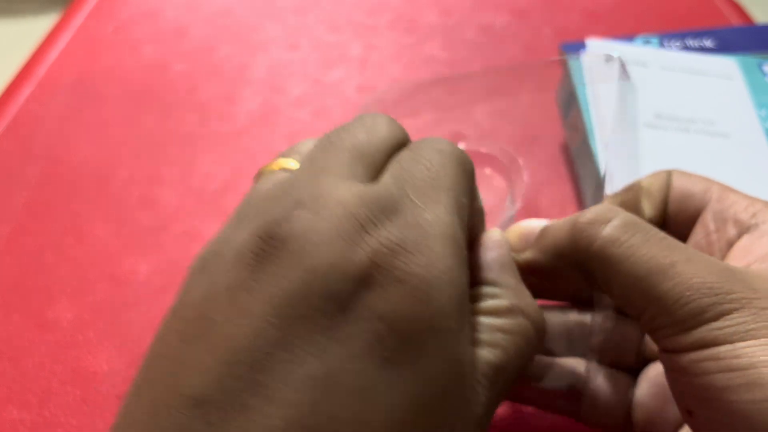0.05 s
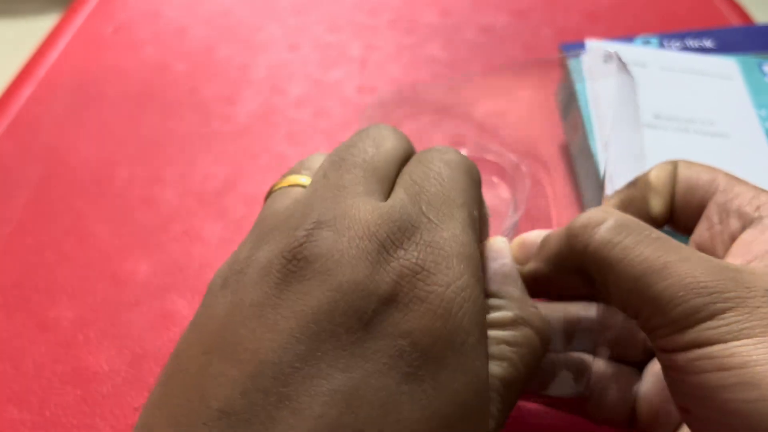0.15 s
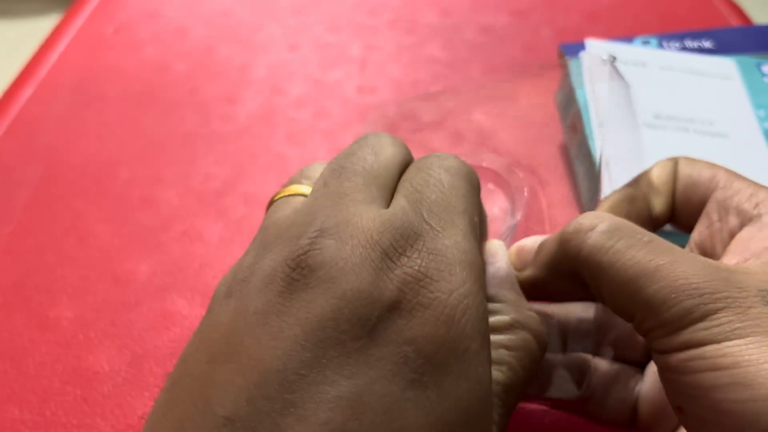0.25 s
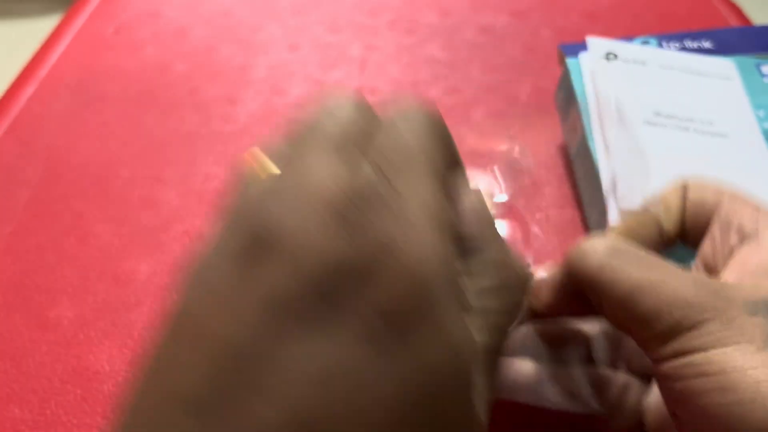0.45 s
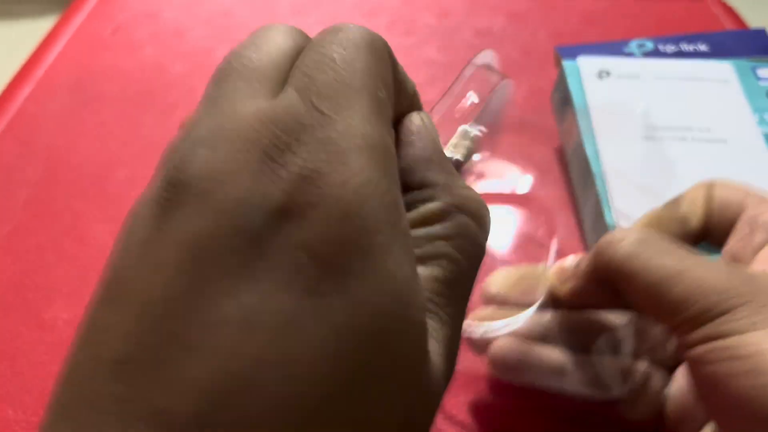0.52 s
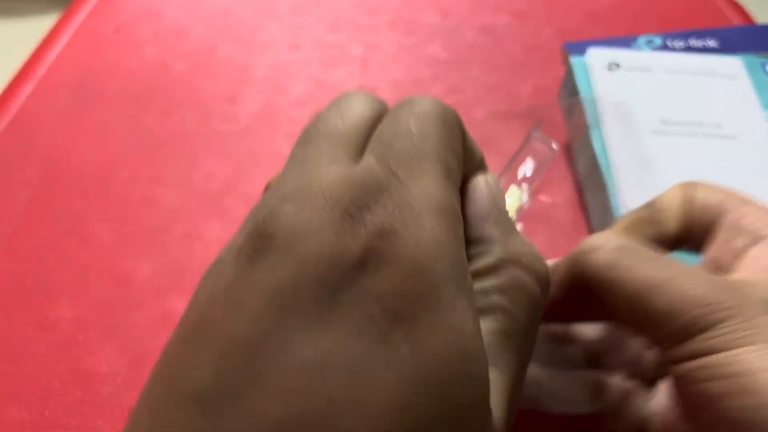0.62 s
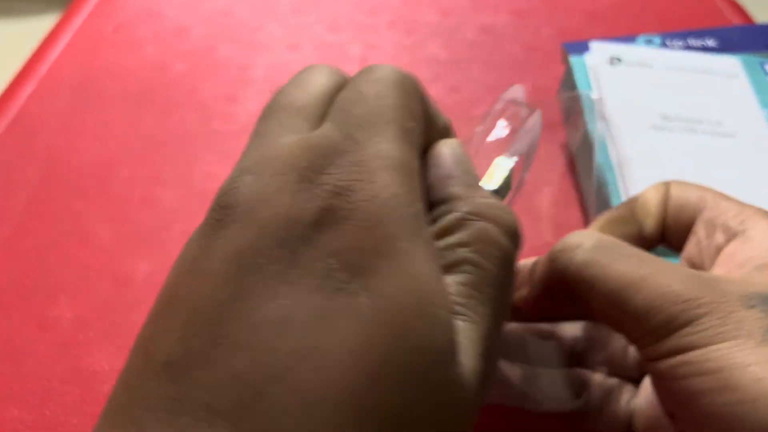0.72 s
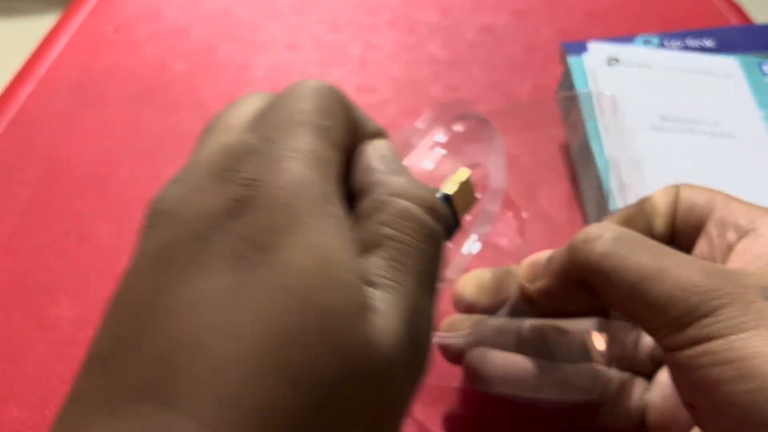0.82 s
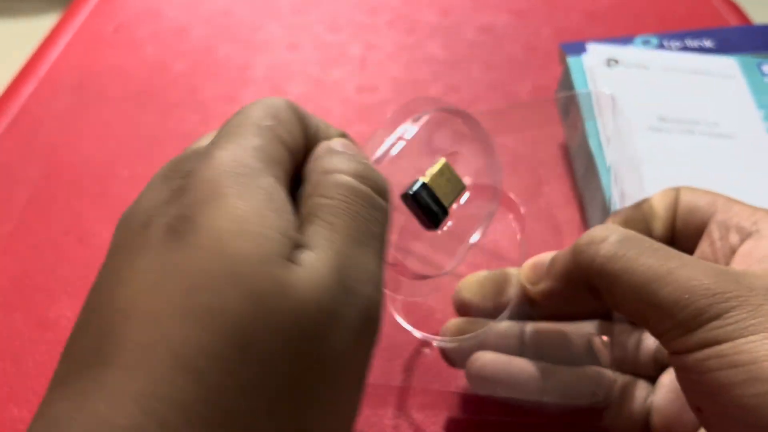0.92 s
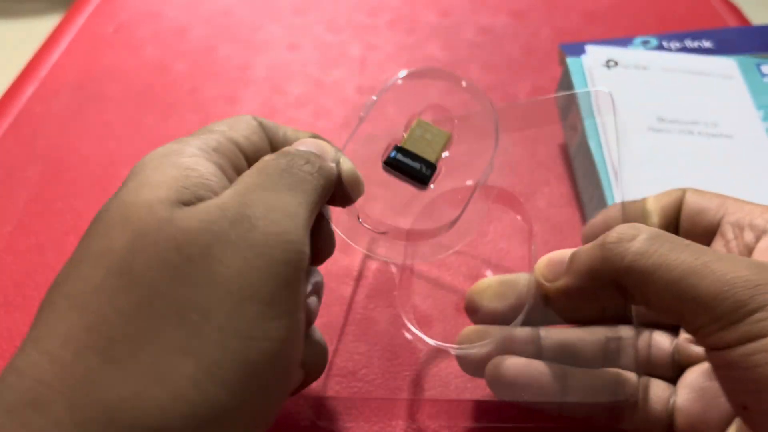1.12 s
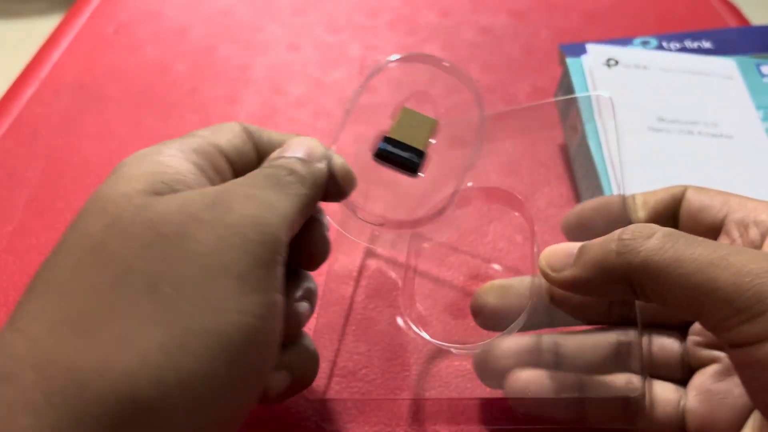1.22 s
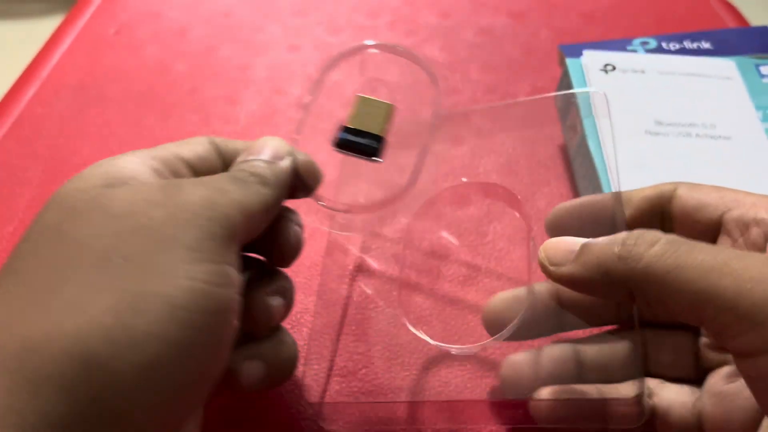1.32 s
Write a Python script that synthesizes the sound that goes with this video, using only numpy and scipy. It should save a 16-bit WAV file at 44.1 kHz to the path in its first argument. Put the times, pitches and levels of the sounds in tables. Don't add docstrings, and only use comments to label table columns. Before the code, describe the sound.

A stiff plastic blister tray is pried open close to the microphone: a few light clicks, then a loud burst of cracks and hollow pops with soft hand bumps, then sparse faint ticks in a quiet room.

```python
import sys
import numpy as np
from scipy import signal
from scipy.fft import rfft, irfft, next_fast_len
from scipy.io import wavfile

SR = 44100
rng = np.random.default_rng(int(sys.argv[2]) if len(sys.argv) > 2 else 0)


def boost(x):
    u = np.asarray(x, float) / 20
    return 10 ** u


def file_out(sig):
    cols = np.atleast_2d(sig).T
    lim = np.clip(cols, -1, 1)
    pcm = np.round(lim * 32767).astype(np.int16)
    wavfile.write(sys.argv[1], SR, pcm)


N = 59535

# (frequency [Hz], level [dB per Hz])
ROOM_COLOUR = [(22, -25.5), (45, -2), (110, -17), (140, -10.5), (480, -14), (620, -24), (2200, -36.5),
               (9000, -76)]
# (frequency [Hz], likeness [0 to 1])
PORT_LIKENESS = [(60, 0.94), (250, 1), (950, 0.2), (3800, 0.2), (15000, 0.601)]
# (frequency [Hz], width [Hz], level [dB])
MAINS_DRONE = [(50.2, 14, -54), (96.7, 9, -54)]
# (time [s], peak level [dB], pitch [Hz], time to fall 60 dB [s])
HAND_BUMPS = [(0.432, -33, 393, 0.03), (0.442, -20.5, 95, 0.045), (0.462, -25, 387, 0.05),
              (0.472, -25, 88.2, 0.066), (0.481, -18.5, 74, 0.11), (0.5, -20, 119.3, 0.025),
              (0.522, -29.5, 72.4, 0.12), (.492, -47, 494, 0.026), (.524, -39, 486, 0.029),
              (0.534, -28.5, 293, 0.0365), (0.545, -39, 427, 0.048), (0.562, -32, 142, 0.078),
              (.617, -43.5, 466, 0.12), (0.541, -19, 89.3, 0.058), (0.66, -25.5, 196, 0.039),
              (0.6614, -32.5, 287.4, 0.12), (0.68, -39, 109, 0.082), (0.787, -30.5, 104.4, 0.11),
              (0.894, -33.5, 104, 0.16)]
# (time [s], rubbing level [dB], crinkle level [dB])
FINGER_WORK = [(0, -68, -66.5), (.22, -73, -80), (0.383, -64, -95), (0.403, -34.5, -58), (0.469, -32, -47),
               (0.508, -34.5, -45), (.54, -55, -66), (.60, -48, -50), (0.643, -49, -50.5),
               (0.708, -75, -76), (0.724, -49.5, -66), (0.772, -45.5, -64.5), (0.831, -64.5, -84.5),
               (0.928, -71, -83.5), (0.987, -56, -79.5), (1.16, -62, -71.5), (1.271, -61.5, -64.5),
               (1.298, -52, -68)]
# (frequency [Hz], width [Hz], level [dB])
CUP_MODES = [(1250, 410, 6), (762, 100, -0.5), (397, 310, -0.5), (2200, 340, -3.5), (3520, 840, -15)]
# (frequency [Hz], level [dB per Hz])
PLASTIC_COLOUR = [(900, -35.5), (1600, 4), (3000, 0), (6400, -3.5), (8300, 8), (10500, 2.5), (14000, -7),
                  (16500, -15)]
# (frequency [Hz], width [Hz], height [dB])
SHEET_MODES = [(2390, 270, 4.5), (3000, 250, 8), (3855, 100, 5), (4430, 390, 7), (5300, 370, 3),
               (6400, 1300, 7.5)]
# (time [s], peak level [dB], pitch [Hz], length [ms])
POPS_AND_RINGS = [(0.123, -27, 1250, 3.45), (0.1523, -23.5, 1250, 3.5), (0.2271, -14.5, 1407, 2.54),
                  (0.391, -11, 1364, 2.73), (0.3929, -25.5, 2200, 1.8), (0.4065, -25, 1666, 1.9),
                  (0.412, -27.5, 1440, 6.1), (0.4198, -27, 1470, 3.3), (0.4262, -1, 1349, 3.0),
                  (.4258, -17.5, 690, 6.24), (0.432, -29, 1250, 1.8), (0.4577, -12, 1328, 4.2),
                  (0.4625, -18.5, 1343, 4.1), (0.4617, -17, 2200, 1), (0.494, -34, 1050, 4.5),
                  (.501, -21.5, 1088, 5.6), (0.585, -22, 1244, 2.4), (0.5888, -25, 1426, 3.37),
                  (0.616, -28.5, 5480, 3.3), (0.633, -27.5, 5400, 1.9), (0.246, -40.5, 4820, 4.7),
                  (1.271, -33, 1300, 2.1), (1.2702, -41, 3720, 3.2), (1.178, -40.5, 2200, 1.2),
                  (1.227, -46.5, 2580, 2.3), (1.252, -44, 2180, 1.6), (0.636, -41.5, 575, 9.4),
                  (1.295, -36, 1210, 2.35), (1.303, -48, 1220, 10), (.722, -39, 1310, 4), (0.728, -41, 1300, 9),
                  (.742, -42.5, 1250, 5.2), (0.767, -48, 1700, 4.5), (0.813, -42.5, 1270, 4.1),
                  (1.338, -40, 1195, 6.4),
                  (0.1252, -29.5, 2390, 2.4), (.1245, -26.5, 5630, 1.2), (0.151, -46, 2960, 5.5),
               (.2265, -46, 2390, 4), (0.2267, -33.5, 3720, 2.6), (0.217, -44, 1701, 22.3),
               (0.379, -44.5, 1690, 17), (.3905, -16.5, 3790, 2.65), (.3908, -18, 4540, 1.36),
               (0.389, -42, 2420, 3.2), (.404, -30, 3000, 2.6), (0.4388, -19, 2817, 2.9),
               (.443, -29.5, 3140, 2.6), (.4465, -33.5, 6400, 3), (0.452, -24, 1450, 2.1),
               (0.4579, -27.5, 4020, 3), (.4875, -25.5, 890, 4.4), (.4925, -27.5, 2150, 4.4),
               (0.4936, -26, 3480, 1.9), (.503, -30, 2070, 6), (.503, -41, 3350, 2.8),
               (0.5911, -35, 1940, 4), (0.59, -31.5, 1247, 6.9), (.617, -35.5, 4280, 4),
               (0.63, -36.5, 3780, 3.8), (1.084, -48.5, 3460, 3.3), (1.085, -52, 2370, 3.2),
               (1.176, -54, 3630, 3), (1.192, -46, 3060, 3.2), (1.237, -56, 2130, 4),
               (1.271, -43.5, 2830, 4.5), (1.289, -42, 3030, 3), (1.301, -49, 2940, 10),
               (1.296, -54, 5900, 5)]
# (frequency [Hz], width [Hz], level [dB])
CUP_AFTER_RING = [(1320, 300, -20), (1750, 260, -16)]
# (time [s], level [dB],
# length [ms], tilt [dB per octave])
CRACKS_AND_TICKS = [(.1249, -33, 1.4, 2), (.140, -56, 6, -1.5), (.168, -57, 7, -2), (.1537, -33.5, 2.25, -0.5),
                    (.2263, -24.5, 1.01, -0.05), (.238, -50, 3.8, 7.5), (.3906, -22.5, 1.3, -1),
                    (.4021, -33, 4, -1), (.4045, -26.5, 1, 2), (.4115, -35.5, 1.2, 4), (.4152, -33, 1.4, 1.5),
                    (.4259, -17, 0.86, -2.5), (.4386, -20, 2.2, -5.5), (.4420, -22.5, 1.7, 1.5),
                    (.4467, -26.5, 0.47, 2), (.4505, -33.5, 2, -5.5), (.4575, -27, 3.2, -5),
                    (.4655, -31.5, 1.9, -7.5), (.474, -40, 3.4, -8), (.489, -24.5, 2.9, -7),
                    (.500, -26.5, 4.0, -8.5), (.5838, -25.5, 1.2, 1), (.5895, -34.5, 1.2, 1),
                    (.6163, -36.5, 2.5, 4), (.6313, -44, 2.25, 7.5), (1.087, -54.5, 2.5, -4.5),
                    (1.2701, -38.5, 0.82, -2.5),
                    (0.038, -51, 1.94, -5.5), (.088, -78, 1.1, -17), (.757, -37.5, 4.9, -8.5),
              (0.769, -60, 3, -7), (0.743, -62, 3, -9), (0.976, -45.5, 4.4, -10), (1.155, -61, 3, 6),
              (1.175, -44, 2.6, -9), (1.193, -50.5, 1, -5.5), (1.205, -58.5, 2.6, -3.5),
              (1.227, -47, 0.99, -10), (1.238, -70, 1.1, -8), (1.288, -57, 9.2, 1),
              (1.301, -55.5, 5.2, -1.5), (1.322, -56, 2, 2)]
# (frequency [Hz], left lead [radians])
PORT_LEAD = [(60, 0), (1000, -.5), (1550, -1.2), (2400, .8), (4570, 1.0), (7900, -3.0), (9600, -3.8),
             (15000, -9.4)]
# (frequency [Hz], left minus right [dB])
PORT_TILT = [(60, 1.0), (180, 2.5), (550, 1.5), (1650, 0.5), (4970, 3.5), (15000, -0.5)]

SIDES = np.array([[1], [-1]])


def rms_one(x):
    return x / np.sqrt(np.mean(x ** 2) + 1e-20)


def at_hz(points, hz):
    p = np.array(points, float)
    return np.interp(np.log(hz + 1), np.log(p[:, 0] + 1), p[:, 1])


def shaped(x, response):
    size = next_fast_len(N + 4096)
    return irfft(rfft(x, size) * response(np.fft.rfftfreq(size, 1 / SR)), size)[..., :N]


def resonate(x, peaks):
    out = 0
    for hz, width, db in peaks:
        r = np.exp(-np.pi * width / SR)
        b = np.array([1, 0, -1]) * (1 - r * r) / 2
        a = [1, -2 * r * np.cos(2 * np.pi * hz / SR), r * r]
        once = signal.lfilter(b, a, x + 1e-18)
        out = out + boost(db) * signal.lfilter(b, a, once)
    return out


def drift(rate_hz):
    r = np.exp(-2 * np.pi * rate_hz / SR)
    wander = signal.lfilter([1], [1, -2 * r, r * r], rng.standard_normal(N + SR))
    return rms_one(wander[SR:])


def rumble():
    def alike(hz):
        return np.clip(at_hz(PORT_LIKENESS, hz), 0, 1)

    mid, side = rng.standard_normal((2, N))
    mid = shaped(mid, lambda hz: boost(at_hz(ROOM_COLOUR, hz)) * np.sqrt(1 + alike(hz)))
    side = shaped(side, lambda hz: boost(at_hz(ROOM_COLOUR, hz)) * np.sqrt(1 - alike(hz)))
    drone = 0
    for hz, width, db in MAINS_DRONE:
        hum = resonate(rng.standard_normal(N + SR), [(hz, width, 0)])
        drone = drone + boost(db) * rms_one(hum[SR:])
    room_level_db = -48
    return boost(room_level_db) * rms_one(mid + side * SIDES) + drone


def room(x):
    t60_s, wall_cut_hz = 0.42, 6600
    t = np.arange(SR // 2) / SR
    fade = boost(-60 * t / t60_s) * np.clip(t / 0.004 - .5, 0, 1)
    mid, side = rng.standard_normal((2, len(t))) * fade
    b, a = signal.butter(1, [300, wall_cut_hz], "band", fs=SR)
    tail = signal.lfilter(b, a, mid + 0.52 * side * SIDES)
    return signal.fftconvolve(x, tail / np.sqrt(np.sum(tail[0] ** 2)), axes=1)[:, :N]


def bumps():
    out, t = np.zeros(N + SR), np.arange(SR // 2) / SR
    for s, db, hz, t60 in HAND_BUMPS:
        swell = 1 - np.exp(-t * hz * 9.8)
        fade = 1.376 * boost(db - 60 * t / t60)
        start = int(s * SR)
        out[start:start + len(t)] += fade * swell * np.sin(2 * np.pi * hz * t)
    return out[:N]


def bright(x):
    return shaped(x, lambda hz: boost(at_hz(PLASTIC_COLOUR, hz)))


def rubbing():
    s, rub_db, crinkle_db = np.transpose(FINGER_WORK)
    now = np.arange(N) / SR
    rub_db, crinkle_db = np.interp(now, s, rub_db), np.interp(now, s, crinkle_db)

    grains_per_s, size_spread_db, clump_db = 6000, 3.0, 2.0
    sizes = boost(size_spread_db * np.minimum(rng.exponential(1, (3, N)), 4))
    sizes = sizes * rng.choice([-1, 1], (3, N))
    chance = grains_per_s * boost(clump_db * drift(50)) / SR
    rub, crinkle, port_own = sizes * (rng.random((3, N)) < chance)
    low = resonate(rub + 0.34 * port_own * SIDES, CUP_MODES)

    pitches, ring_cycles, tilt_db = np.geomspace(2200, 13500, 16), 4.7, -9
    dealt = rng.integers(0, 16, N)
    lean = boost(2 * rng.standard_normal(N) * SIDES)
    high = 0
    for k, hz in enumerate(pitches):
        mode = (hz, 11.0 * hz / ring_cycles, tilt_db * np.log2(hz / 5000))
        struck = 2 * crinkle * lean * (dealt == k) + .5 * crinkle
        high = high + resonate(struck, [mode])
    return boost(rub_db + 2) * rms_one(low) + boost(crinkle_db + 2) * rms_one(bright(high))


def pops():
    out, t = np.zeros(N + SR), np.arange(2048) / SR
    for s, db, hz, ms in POPS_AND_RINGS:
        u = np.clip(1000 * t / max(ms, .5), 0, 1)
        hump = np.sin(np.pi * u ** 1.31) ** 1.19
        out[int(s * SR):][:2048] += boost(db) * hump * np.sin(2 * np.pi * hz * t)
    return out[:N] + resonate(out[:N], CUP_AFTER_RING)


def sheet(hz):
    humps_db = sum(db / (1 + (2 * (hz - at) / width) ** 2) for at, width, db in SHEET_MODES)
    return boost(-3.5 + humps_db)


def cracks():
    own_share, first_break = .25, 2.5
    spray, t = np.zeros((2, N + SR)), np.arange(2048) / SR
    rows = CRACKS_AND_TICKS
    octaves = np.log2(np.fft.rfftfreq(2048, 1 / SR) / 5000 + 0.041)
    for (s, db, ms, tilt_db), noise in zip(rows, rng.standard_normal((len(rows), 3, 2048))):
        ms = max(ms, .2)
        grit = (noise[0] + own_share * noise[1] * SIDES) * boost(2 * noise[2])
        grit[:, int(ms * SR / 2000)] += first_break
        grit = irfft(rfft(grit) * boost(tilt_db * octaves))
        u = 2000 * t / ms
        burst = u * np.exp(1 - u)
        trail = 0.13 * (1 - np.exp(-u)) * np.exp(-u / 8.4)
        spray[:, int(s * SR):][:, :2048] += boost(db) * rms_one(grit) * (burst + trail)
    return boost(7.0) * bright(shaped(spray[:, :N], sheet))


def snaps():
    def table_echo(hz):
        delay_s, echo_db, cut_hz = .0034, -14, 3000
        return 1 + boost(echo_db) * np.exp(-2j * np.pi * hz * delay_s) / (1 + 1j * hz / cut_hz)

    return shaped(pops() + cracks(), table_echo)


def scene():
    tray = snaps() + rubbing()
    room_tail_db = -19
    return tray + bumps() + boost(room_tail_db) * room(tray) + rumble()


def top_cut(x):
    return signal.sosfilt(signal.butter(12, 16870, fs=SR, output="sos"), x)


def record(dry):
    def ports(hz):
        dip = 1 - .7 * np.exp(-((hz - 8400) / 800) ** 2)
        half = SIDES / 2
        return dip * boost(half * at_hz(PORT_TILT, hz)) * np.exp(1j * half * at_hz(PORT_LEAD, hz))

    low_cut_hz, peak_top = 21, .92
    x = shaped(dry, ports)
    x = signal.sosfilt(signal.butter(2, low_cut_hz, "high", fs=SR, output="sos"), x)
    x = x / (1 + (x / peak_top) ** 6) ** (1 / 6)
    return top_cut(x)


dry = scene()
out = record(dry)
file_out(out)
```